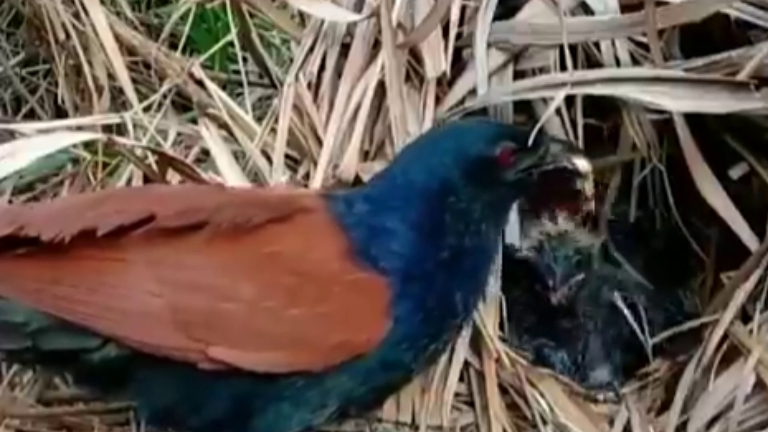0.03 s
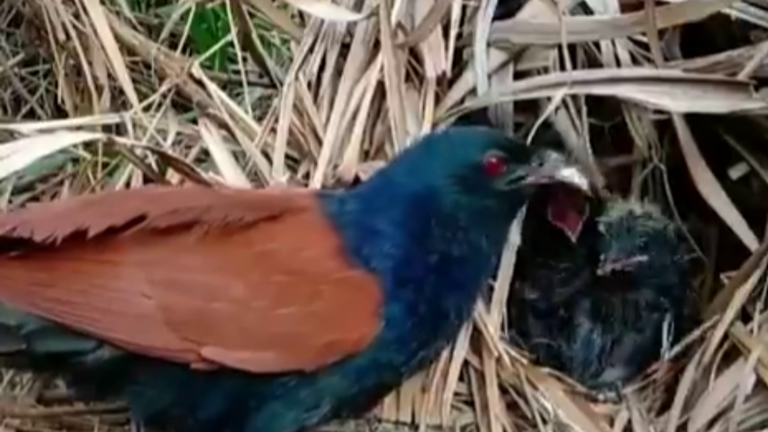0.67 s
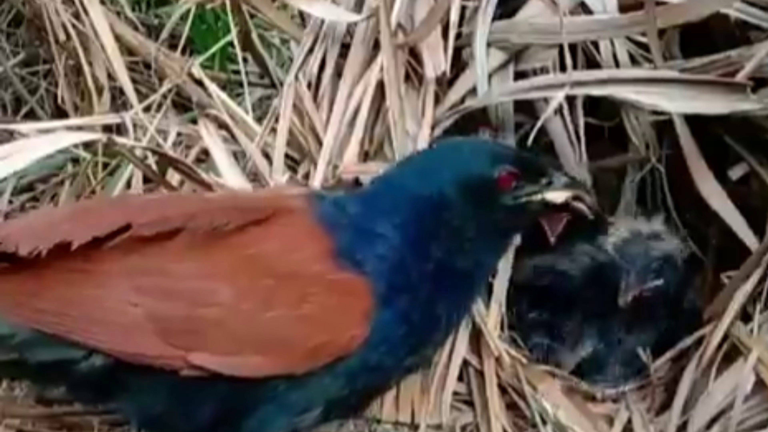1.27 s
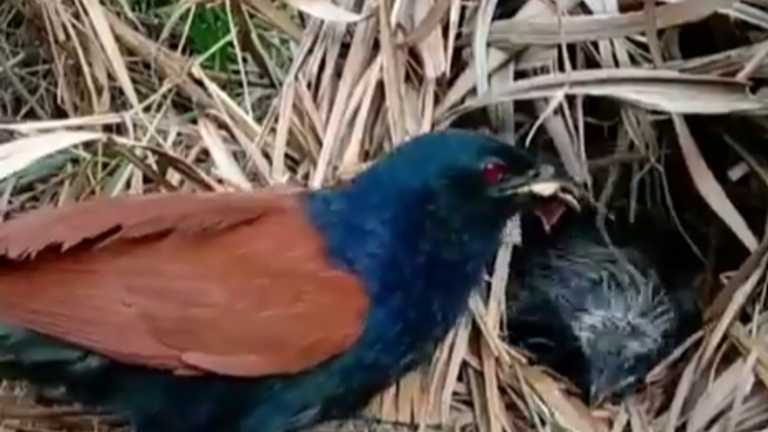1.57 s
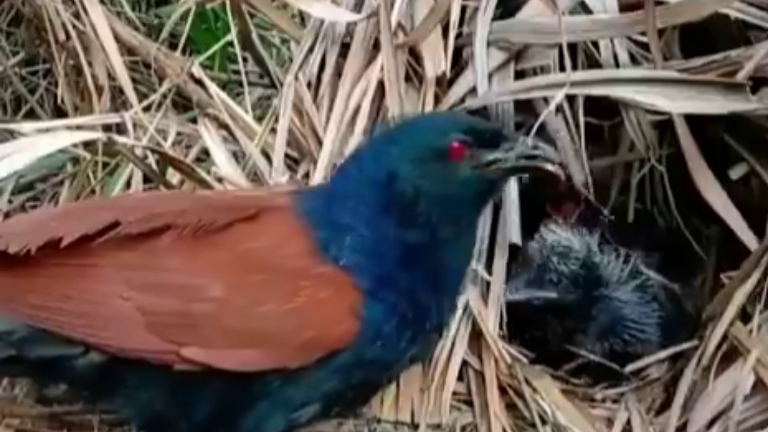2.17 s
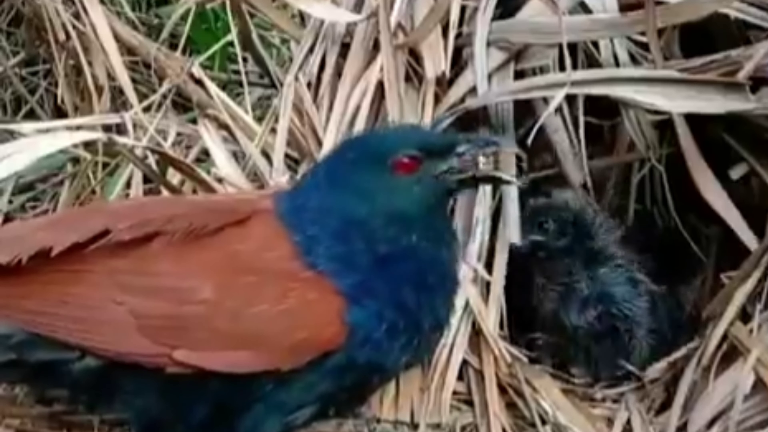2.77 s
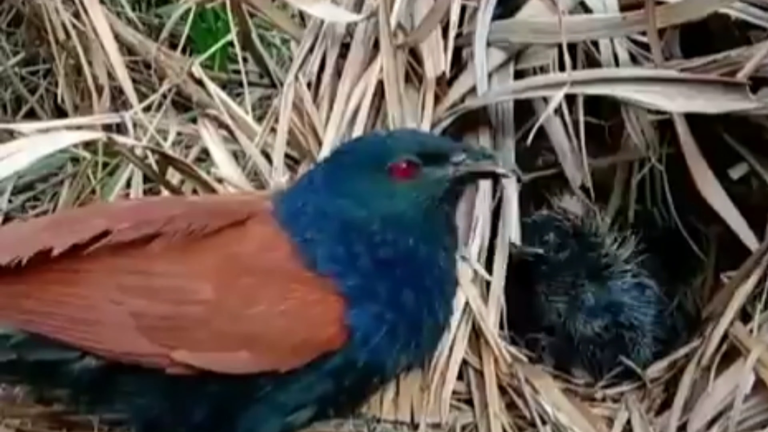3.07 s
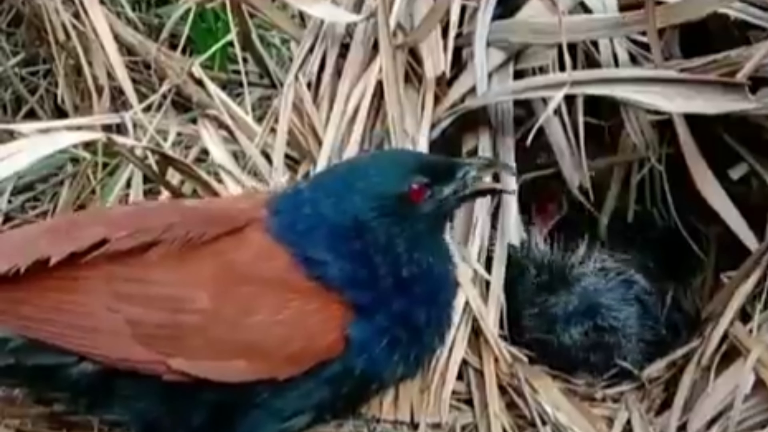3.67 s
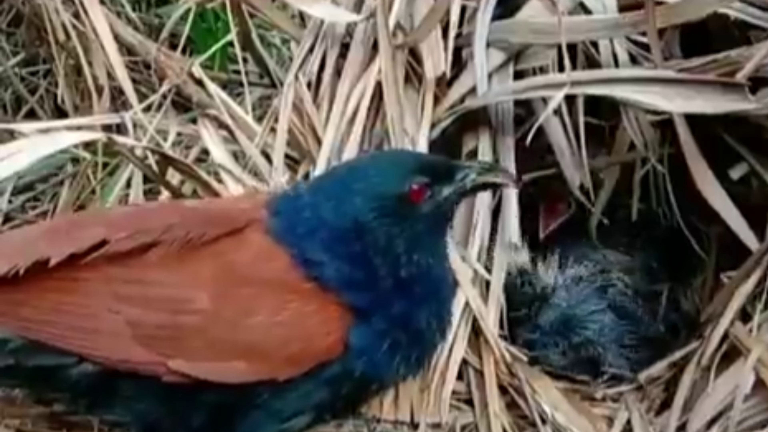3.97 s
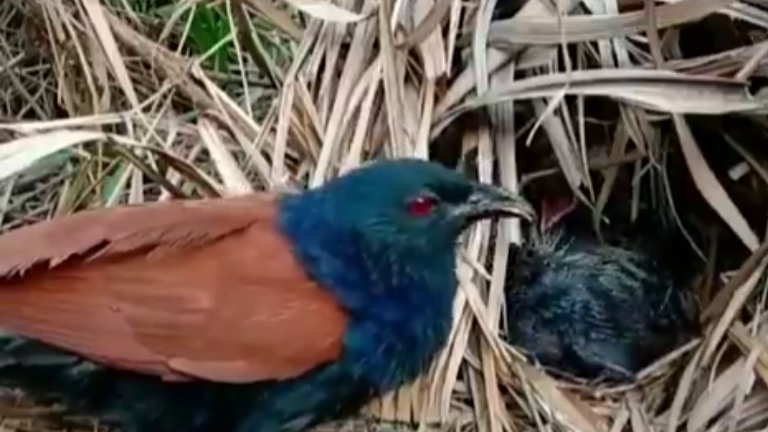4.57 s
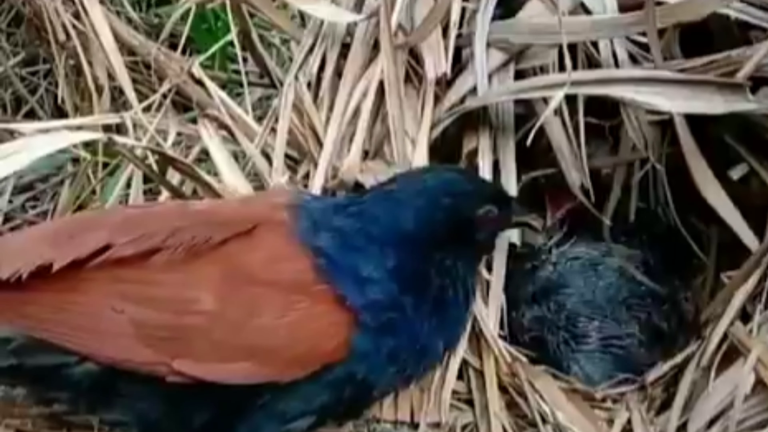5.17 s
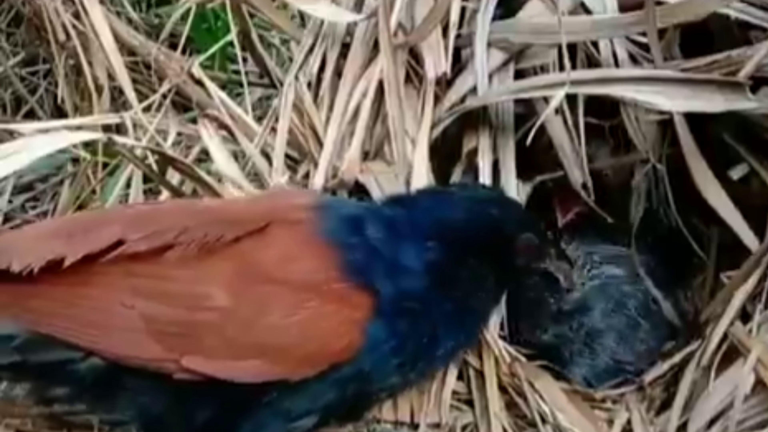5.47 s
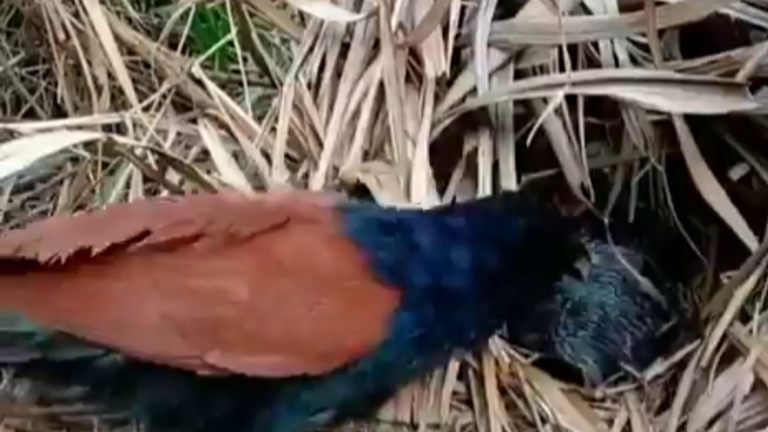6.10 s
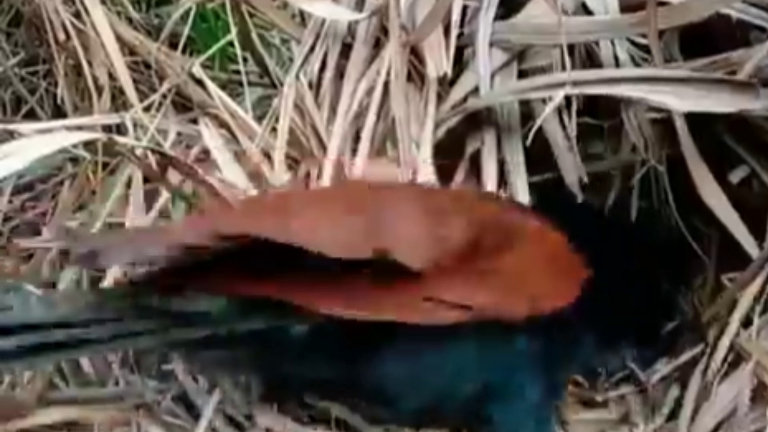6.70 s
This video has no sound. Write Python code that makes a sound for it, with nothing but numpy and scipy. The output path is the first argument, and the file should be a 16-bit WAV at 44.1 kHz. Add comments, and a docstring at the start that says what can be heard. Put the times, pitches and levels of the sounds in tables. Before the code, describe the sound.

Baby birds rasp insistently at a nest outdoors, heard from close up. Their scratchy, high-pitched begging pulses in one short bout after another from start to finish, dotted with sharp hisses and brief squawks. Further off there is faint high twittering and quiet open air. A little after halfway, four small rising chirps sound, and blurred distant bird calls grow slightly in the later part.

```python
"""At a nest of dry grass, nestlings beg while a parent bird feeds them.
They rasp in breath-long bouts that surge about five times a second: irregular syrinx pulses and hiss
ring in a small throat, and each surge peaks in a spit of air and a short squawk.
Behind them are thin high twittering, four rising chirps from another bird, blurred distant calls
and the faint murmur of the outdoors."""
import sys
import numpy as np
from scipy import signal
from scipy.fft import rfft, irfft
from scipy.io import wavfile
from scipy.ndimage import uniform_filter1d

SR = 44100
rng = np.random.default_rng(int(sys.argv[2]) if len(sys.argv) > 2 else 0)


def put_to_file(sound):
    """Save the sound as 16-bit audio at rate SR, in the file named by the first command-line argument."""
    columns = np.atleast_2d(sound).T  # one column per channel
    safe = np.clip(columns, -1, 1)
    whole_steps = np.round(safe * 32767)
    wavfile.write(sys.argv[1], SR, whole_steps.astype(np.int16))


N = 301644


def from_db(db):
    """Decibels to gain."""
    return 10 ** (np.asarray(db) / 20)


def unit_rms(x):
    """Scale to unit power."""
    return x / np.sqrt(np.mean(x ** 2) + 1e-20)


def automation(rows):
    """Join (seconds, value) breakpoints into a curve with a value at every sample."""
    times, values = np.transpose(rows)
    return np.interp(np.arange(N) / SR, times, values)


def drift(rate_hz):
    """Smooth random modulation with a spread of 1, moving at about rate_hz."""
    hop, settle = 40, 2000
    pole = np.exp(-2 * np.pi * hop * rate_hz / SR)
    noise = rng.standard_normal(N // hop + settle + 2)
    slow = signal.lfilter([1], [1, -2 * pole, pole * pole], noise)[settle:]
    return np.interp(np.arange(N) / hop, np.arange(len(slow)), unit_rms(slow))


def resonance(x, hz, width_hz):
    """A steep-sided resonance at unit power; its centre may be steady or move."""
    carrier = np.exp(2j * np.pi * np.cumsum(np.broadcast_to(hz, N)) / SR)
    skirts = signal.butter(3, width_hz / 2, fs=SR, output="sos")
    return unit_rms((signal.sosfilt(skirts, x * carrier.conj()) * carrier).real)


def leveller(x, span_s):
    """Keep the pulses but iron out slower swings of level."""
    return x / np.sqrt(np.abs(uniform_filter1d(x * x, int(span_s * SR))) + 1e-6)


def soft_limit(x, ceiling):
    """Round off swings whose amplitude would pass the ceiling."""
    amplitude_squared = 2 * np.abs(uniform_filter1d(x * x, size=30))
    return x / (1 + (amplitude_squared / ceiling ** 2) ** 2) ** (1 / 4)


def foliage(x, t60_s, wet_db):
    """Stems and leaves return a short diffuse tail."""
    t = np.arange(SR // 2) / SR
    tail = rng.standard_normal(len(t)) * from_db(-60 * t / t60_s)
    return x + from_db(wet_db) * signal.fftconvolve(x, tail / np.linalg.norm(tail))[:N]


# Tone of the outdoor bed. Each row: frequency in Hz, relative spectral level in dB.
HUSH_EQ = [(25, -2.5), (55, -10), (105, 0.5), (160, -2.5), (330, -6), (560, -5.5), (950, -8.5), (1750, -6),
           (2200, -2), (3500, 0.5), (5500, -2), (6600, -11), (9500, -28), (15000, -20.5)]
# Its fader. Each row: time in seconds, level in dB.
HUSH_FADER = [(0, -45.5), (2.7, -46), (3.8, -45.5), (6.84, -44.5)]


def outdoors(rumble_db):
    """A steady far hush over a wavering low rumble that drops away after about four seconds."""
    hz = np.fft.rfftfreq(N, 1 / SR)
    eq_hz, eq_db = np.transpose(HUSH_EQ)
    colour = from_db(np.interp(np.log(hz + 1), np.log(eq_hz), eq_db))
    hush = unit_rms(irfft(rfft(rng.standard_normal(N)) * colour, N))
    rumble = resonance(rng.standard_normal(N), hz=103., width_hz=53)
    swell_db = automation([(0, -3), (1.1, 4.5), (3.3, 2.5), (4.2, 3), (4.7, -28), (6.84, -26)])
    return from_db(automation(HUSH_FADER)) * hush + from_db(rumble_db + swell_db) * rumble


# Fader of the distant birds. Each row: time in seconds, level in dB.
FAR_BIRD_FADER = [(0, -67), (2.7, -55), (3.75, -49), (4.45, -45), (5.25, -44), (6.23, -43.5), (6.84, -49)]


def far_birds(hz, width_hz, wander):
    """Birds far off blur into two thin bands of noise that wander in pitch and slowly fade up."""
    calls = 0
    for _ in range(2):
        band = resonance(rng.standard_normal(N), hz * (1 + wander * drift(8.2)), width_hz)
        calls += band * from_db(5.2 * drift(8.7))
    return from_db(automation(FAR_BIRD_FADER)) * unit_rms(calls)


# Fader of the twittering. Each row: time in seconds, level in dB.
TWITTER_FADER = [(0, -34), (1.15, -34.5), (1.92, -37.5), (2.7, -36.5), (3.77, -36), (4.44, -34.5),
                 (5.25, -36), (6.23, -35.5), (6.84, -38)]


def twitter(top_hz, arch_hz, notes_per_s):
    """Thin arched notes of two birds overlap closely, blurred by the vegetation."""
    notes = 0
    for shift_hz, db in [(0, 0), (-arch_hz / 2, -4)]:
        pace = notes_per_s * np.exp(.3 * drift(7.3))
        arch = np.sin(np.pi * np.cumsum(pace) / SR) ** 2
        hz = top_hz + shift_hz + arch_hz * (arch - 1) + 70 * drift(10) + 90 * drift(262)
        gain = (1.9 + arch) * from_db(db + 4.8 * drift(32))
        notes += gain * np.sin(2 * np.pi * np.cumsum(hz) / SR)
    haze = resonance(rng.standard_normal(N), top_hz - arch_hz, width_hz=1070)
    blurred = foliage(unit_rms(notes), t60_s=.08, wet_db=-7) + from_db(-4) * haze
    return from_db(automation(TWITTER_FADER)) * unit_rms(blurred)


# Four rising chirps and a few fainter notes.
# Each row: start in seconds, level in dB, start pitch in Hz, end pitch in Hz, length in seconds.
CHIRP_CUES = [(1.874, -47, 4250, 4094, 0.05), (3.971, -28.5, 3400, 4880, 0.021),
              (4.112, -30, 3330, 4900, .028), (4.255, -29, 3190, 4860, 0.034),
              (4.401, -28.5, 3050, 4950, 0.0337), (4.421, -32, 5070, 5200, 0.051),
              (4.458, -33, 7000, 6630, 0.037), (6.234, -42, 4150, 4380, 0.045)]


def chirps(partial_ratio, partial_db):
    """Small birds further off whistle short quivering glides, each with a faint high partial."""
    out = np.zeros(N)
    quiver = 1 + .022 * drift(400)
    for start_s, db, start_hz, end_hz, length_s in CHIRP_CUES:
        progress = np.linspace(0, 1, int(length_s * SR))
        at = int(start_s * SR) + np.arange(len(progress))
        glide_hz = start_hz + (end_hz - start_hz) * progress ** 0.904
        phase = 2 * np.pi * np.cumsum(glide_hz * quiver[at]) / SR
        whistle = np.sin(phase) + from_db(partial_db) * np.sin(partial_ratio * phase)
        out[at] += from_db(db) * np.sin(np.pi * progress ** 1.2) ** 2 * whistle
    return foliage(out, t60_s=.14, wet_db=-10)


def surge_shape(peak_s, rise_s):
    """A rounded peak with exponential flanks, falling more slowly than it rises."""
    age = np.arange(N) / SR - peak_s
    flank_s = np.where(age > 0, 1.45 * rise_s, rise_s)
    return np.exp(1 - np.hypot(1, np.clip(age / flank_s, -40, 40)))


# Bouts of begging, one breath each. Each row: start and end in seconds, held effort in dB,
# then the opening push's effort, gape and windpipe ring in dB.
BEGGING_BOUTS = [(0.041, 1.125, -29, -24, -60, -38.5), (1.215, 1.898, -30.5, -21.5, -46, -34.5),
                 (1.979, 2.657, -29, -20.5, -44.5, -35), (2.741, 3.739, -30, -23, -49, -40),
                 (3.816, 4.408, -33.5, -18.5, -41, -39), (4.489, 5.226, -27.5, -20.5, -38.5, -47),
                 (5.293, 6.205, -27, -20.5, -40.5, -55), (6.29, 6.979, -29, -14.5, -40, -47)]
# Surges on top of the bouts; they also cue the spits and squawks. Each row: peak time in seconds,
# effort in dB, rise in seconds, gape in dB, windpipe ring in dB, beak pitch in Hz, squawk level in dB.
BEGGING_SURGES = [(0.353, -20, 0.012, -39, -49, 5940, -44), (0.557, -19.5, 0.02, -37.5, -34.5, 5990, -35.5),
                  (0.771, -18.5, 0.018, -38, -38.5, 6010, -40), (0.964, -18, .013, -38.5, -47, 6030, -38),
                  (1.507, -18, 0.018, -34, -37, 6040, -35.5), (1.698, -21, 0.02, -36.5, -50, 6036, -34),
                  (2.235, -18.5, .016, -41, -38, 5956, -41.5), (2.436, -17, .018, -37, -36, 6080, -36),
                  (3.0, -22.5, 0.022, -42, -46, 5935, -56), (3.196, -16.5, .017, -38, -35.5, 6100, -39),
                  (3.396, -19.5, 0.013, -33.5, -40, 6090, -43), (3.58, -20.5, .019, -35, -37.5, 6142, -37),
                  (4.077, -18, .015, -36.5, -36.5, 5980, -38), (4.222, -21.5, 0.024, -38.5, -41, 5807, -52),
                  (4.798, -18, .016, -33, -48, 6080, -34), (5.001, -17.5, 0.018, -34, -39, 6100, -36),
                  (5.598, -15, .02, -36, -44, 5970, -45), (5.825, -16.5, .017, -34.5, -63, 6050, -49),
                  (6.035, -15, .016, -36, -50, 6112, -43), (6.537, -16.5, .016, -39, -39, 6240, -33.5),
                  (6.724, -17.5, 0.015, -34, -38.5, 6180, -45)]
# Main beak resonance between surges. Each row: time in seconds, pitch in Hz.
BEAK_REST_PITCH = [(0, 5735), (1.2, 5840), (6.0, 5940), (6.84, 6103)]
# The floor between bouts: effort, gape and windpipe ring in dB.
FLOOR_DB = [-59, -57.5, -64]


def begging(attack_s, release_s, push_s, sag_db_per_s, gape_lag_s):
    """Control curves of the call: each bout opens with a push, is held as the bird tires, and surges."""
    t = np.arange(N) / SR
    effort, gape, ring, breath = np.zeros((4, N))
    for start_s, end_s, held_db, push_db, gape_db, ring_db in BEGGING_BOUTS:
        on = (t > start_s) & (t < end_s)
        age = t[on] - start_s
        breath[on] = (np.minimum(age / attack_s, 1) * np.minimum((end_s - t[on]) / release_s, 1)) ** 2
        held = from_db(held_db - sag_db_per_s * age)
        push = np.exp(-(age / push_s) ** 2)
        effort[on] = held + from_db(push_db) * push
        gape[on] = from_db(-25) * held + from_db(gape_db) * push * 2 * age / push_s
        ring[on] = from_db(-15.5) * held + from_db(ring_db) * push
    rest_hz = automation(BEAK_REST_PITCH)
    beak_hz = rest_hz.copy()
    for peak_s, effort_db, rise_s, gape_db, ring_db, peak_hz, _ in BEGGING_SURGES:
        surge = surge_shape(peak_s, rise_s)
        effort += from_db(effort_db) * surge
        gape += from_db(gape_db) * surge
        ring += from_db(ring_db) * surge
        beak_hz += (peak_hz - rest_hz) * surge
    # the gape opens and closes late
    lag = np.exp(-1 / (gape_lag_s * SR))
    gape = signal.lfilter([1 - lag], [1, -lag], gape)
    floor = from_db(FLOOR_DB)[:, None]
    effort_db, gape_db, ring_db = 20 * np.log10(breath * [effort, gape, ring] + floor)
    return effort_db, gape_db, ring_db, beak_hz


# Bands of the spit. Each row: centre in Hz, width in Hz, level in dB relative to the surge's effort.
SPIT_EQ = [(7030, 810, -15), (8500, 1550, -16.5), (12840, 1200, -17.5), (14100, 2800, -26)]


def spits(lead_s, rise_s, decay_s):
    """The beak flies open just before a squawk and lets out a sharp, bright hiss."""
    t = np.arange(N) / SR
    bursts = 0
    for peak_s, effort_db, *_ in BEGGING_SURGES:
        age = np.maximum(t - peak_s + lead_s, 0)
        attack = 1 - np.exp(-age / rise_s)
        decay = np.exp(-np.minimum(age / decay_s, 10) ** 2)
        bursts += from_db(effort_db) * attack * decay
    noise = rng.standard_normal(N)
    hiss = sum(from_db(db) * resonance(noise, hz, width_hz) for hz, width_hz, db in SPIT_EQ)
    return bursts * hiss * from_db(3.5 * drift(300))


# Squawk partials with the beak at SQUAWK_BEAK_HZ: two rise, the strong top one dips.
# Each row: start pitch in Hz, end pitch in Hz, level in dB relative to the squawk.
SQUAWK_GLIDES = [(2150, 2560, 0.5), (2750, 3420, -0.5), (5990, 5750, 14)]
SQUAWK_BEAK_HZ = 5943
HOOT_START_HZ, HOOT_END_HZ = 1251, 1304


def squawks(length_s, delay_s, waver):
    """At the top of a surge the rasp briefly locks into a few gliding tones and the windpipe hoots."""
    out = np.zeros(N)
    progress = np.linspace(0, 1, int(length_s * SR))
    swell = np.sin(np.pi * progress) ** 2
    bends = [1 + waver * drift(29) + waver / 2 * drift(240) for _ in range(len(SQUAWK_GLIDES) + 1)]
    for peak_s, *_, ring_db, beak_hz, squawk_db in BEGGING_SURGES:
        at = int((peak_s + delay_s - length_s / 2) * SR) + np.arange(len(progress))
        transpose = (beak_hz / SQUAWK_BEAK_HZ) ** 2
        tones = [(transpose * start, transpose * end, squawk_db + db) for start, end, db in SQUAWK_GLIDES]
        hoot = (HOOT_START_HZ, HOOT_END_HZ, ring_db + 0.5)
        for (start_hz, end_hz, db), bend in zip(tones + [hoot], bends):
            hz = (start_hz + (end_hz - start_hz) * progress) * bend[at]
            out[at] += from_db(db) * swell * np.sin(2 * np.pi * np.cumsum(hz) / SR)
    return out


def syrinx(strain_db, pulse_hz, jitter, puff_s):
    """Irregular slaps, faster under strain; returns the slaps and the puff of air after each."""
    rate_hz = pulse_hz * np.exp(.018 * strain_db + jitter * drift(130))
    slaps = np.diff(np.floor(np.cumsum(rate_hz) / SR), prepend=0)
    puffs = signal.lfilter([1], [1, -np.exp(-1 / (puff_s * SR))], slaps + 1e-18)
    return unit_rms(slaps), unit_rms(puffs)


# Resonances that follow the beak. Each row: multiple of the beak pitch, width in Hz, level in dB
# relative to the usual drive, dB gained per dB of drive, wander as a fraction of the centre.
BEAK_FORMANTS = [(.995, 800, -2.5, 1.0, 0.02), (1.025, 260, -6, 1.23, 0.016),
                 (.962, 101, -10, 1.04, 0.0068)]
# Resonances of the throat, open gape, low growl and windpipe.
# Each row: centre in Hz before tuning, then width, level, gain and wander as for the beak.
THROAT_FORMANTS = [(5200, 800, -9, 0.5, 0.013), (5111, 210, -10.5, 0.13, 0.019),
                   (7050, 1030, -12.5, 0.23, 0.019), (7650, 250, -20, 1.17, 0.013),
                   (8443, 490, -18, 0.27, 0.021), (9270, 400, -29, 0.33, 0.011),
                   (12030, 1700, -25, 0.72, 0.028), (11990, 690, -25.5, 0.64, 0.0082),
                   (13600, 3500, -29, 0.34, .005), (11250, 1500, -39, 0.37, 0.0043)]
GAPE_FORMANTS = [(2498, 477, -6, 0.44, 0.038), (3320, 720, -5.5, 1.0, 0.027), (3740, 800, -7, 1.34, 0.027)]
GROWL_FORMANTS = [(582, 48, -29, -0.5, 0.0803), (647, 295, -30.5, 0, 0.03), (945, 426, -28.5, 0, 0.055)]
WINDPIPE_FORMANTS = [(1271.3, 68, -4.5, 1.0, 0.022), (1370, 350, -9, 0.85, 0.03)]
# Catches, where the rasp jumps out. Each row: time in seconds, extra effort in dB, half-width in seconds.
VOICE_CATCHES = [(0.334, 6, .005), (3.564, 3, .006)]
USUAL_EFFORT_DB, USUAL_GAPE_DB, USUAL_RING_DB = -24, -42, -42


def nestlings(hiss_db, flutter_db, growl_flutter_db, headroom_db, stretch_per_db):
    """Slaps and pulsed hiss ring the throat; effort brightens the call as the gape opens."""
    t = np.arange(N) / SR
    effort_db, gape_db, ring_db, beak_hz = begging(
        attack_s=.045, release_s=.057, push_s=.111, sag_db_per_s=1.33, gape_lag_s=.0047)
    for time_s, extra_db, width_s in VOICE_CATCHES:
        effort_db += extra_db * np.exp(-((t - time_s) / width_s) ** 2)
    strain_db = effort_db - USUAL_EFFORT_DB
    slaps, puffs = syrinx(strain_db, pulse_hz=339.9, jitter=.25, puff_s=.002)
    exciters = [slaps + from_db(hiss_db) * puffs * noise for noise in rng.standard_normal((3, N))]

    def cavity(formants, drive_db, usual_db, tuning):
        """Each resonance wanders a little while its level rides the drive."""
        out = 0
        for k, (centre, width_hz, db, growth, wander) in enumerate(formants):
            hz = centre * tuning * (1 + wander * drift(21.7))
            voice = resonance(exciters[k % len(exciters)], hz, width_hz)
            level_db = usual_db + db + growth * (drive_db - usual_db)
            out += leveller(voice, span_s=.02) * from_db(level_db)
        return out

    beak = cavity(BEAK_FORMANTS, effort_db, USUAL_EFFORT_DB, tuning=beak_hz)
    # the air pressure behind the call limits how far it can swing
    beak = soft_limit(beak, ceiling=from_db(effort_db + headroom_db))
    # straining tightens the throat and lifts its resonances
    throat = cavity(THROAT_FORMANTS, effort_db, USUAL_EFFORT_DB, tuning=1 + stretch_per_db * strain_db)
    gape = cavity(GAPE_FORMANTS, gape_db, USUAL_GAPE_DB, tuning=.93)
    growl = cavity(GROWL_FORMANTS, effort_db, USUAL_EFFORT_DB, tuning=.938)
    growl *= from_db(growl_flutter_db * drift(13.8))
    windpipe = cavity(WINDPIPE_FORMANTS, ring_db, USUAL_RING_DB, tuning=1) * from_db(2.8 * drift(38))
    # the syrinx only sounds above a threshold of effort
    gate = 1 / (1 + from_db(-35 - effort_db) ** 2)
    return (beak + throat + gape + growl) * gate * from_db(flutter_db * drift(23)) + windpipe


def scene():
    """The nest close by, the other birds and the open air behind, in mono."""
    nest = nestlings(hiss_db=5.5, flutter_db=1.23, growl_flutter_db=3, headroom_db=8.5,
                     stretch_per_db=.0014)
    nest += squawks(length_s=.07, delay_s=.009, waver=.0086)
    nest += spits(lead_s=.022, rise_s=.013, decay_s=.039)
    foreground = foliage(nest, t60_s=.08, wet_db=-4)
    birds = twitter(top_hz=8143, arch_hz=304.2, notes_per_s=12)
    birds += chirps(partial_ratio=2.6, partial_db=-28)
    birds += far_birds(hz=5360, width_hz=770, wander=.076)
    return (foreground + birds + outdoors(rumble_db=-61.5))[None]


def record(dry):
    """The highest peaks are rounded and the top of the treble is cut steeply."""
    high_cut = signal.ellip(14, .1, 90, 15450, fs=SR, output="sos")
    return signal.sosfilt(high_cut, soft_limit(dry, ceiling=.68))


dry = scene()
out = record(dry)
put_to_file(out)
```